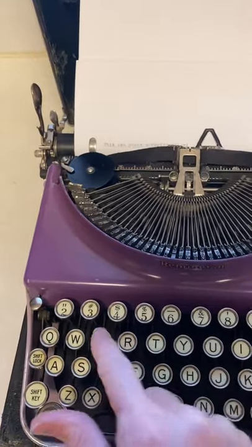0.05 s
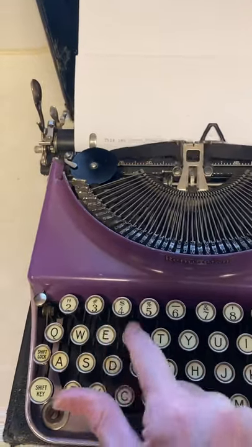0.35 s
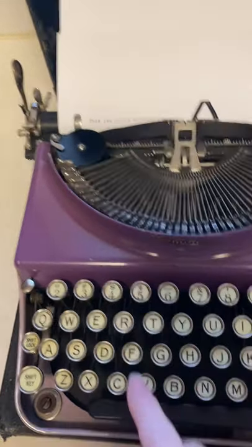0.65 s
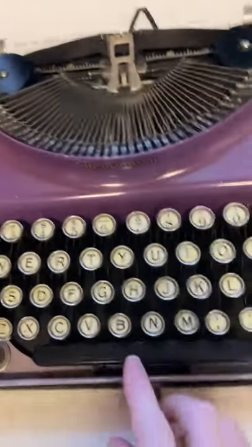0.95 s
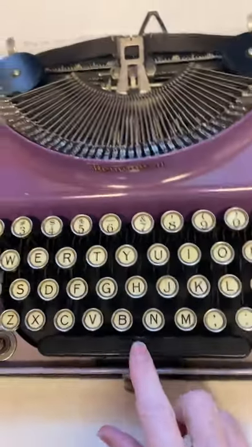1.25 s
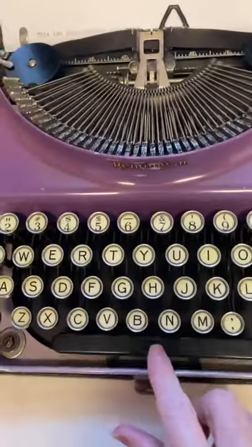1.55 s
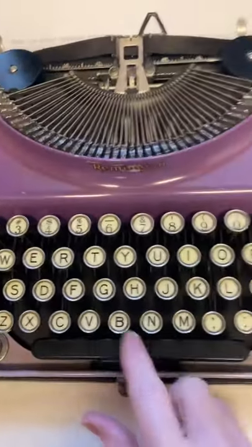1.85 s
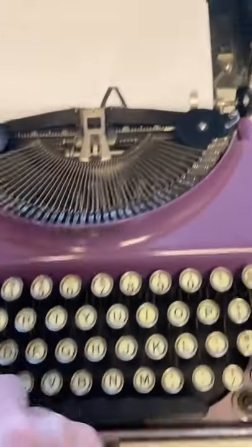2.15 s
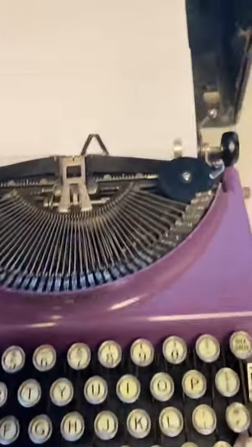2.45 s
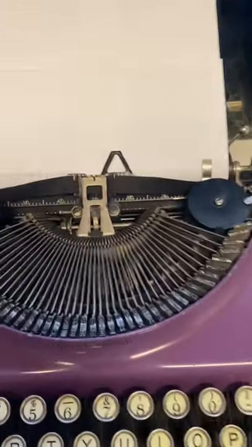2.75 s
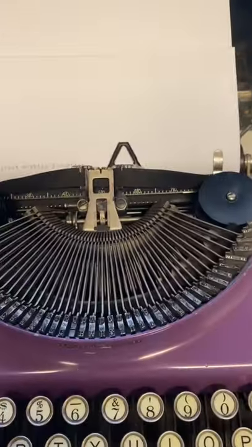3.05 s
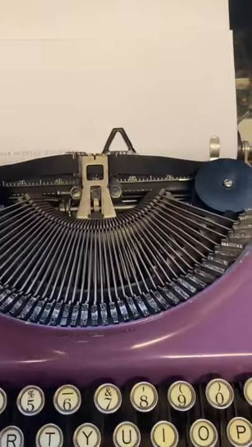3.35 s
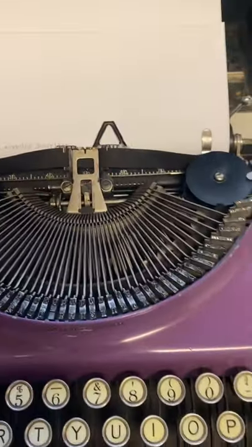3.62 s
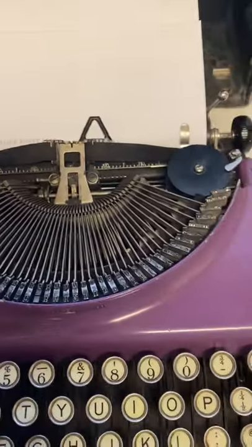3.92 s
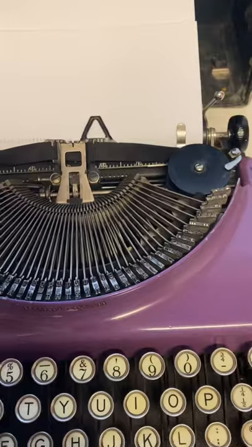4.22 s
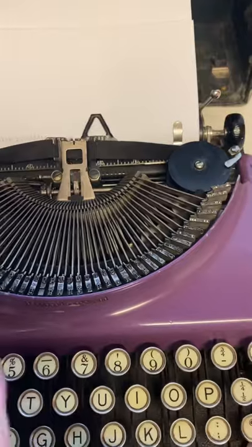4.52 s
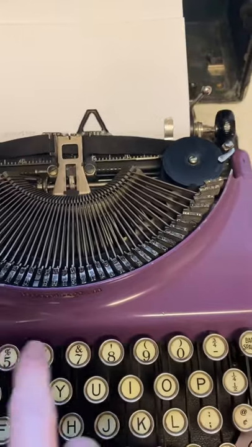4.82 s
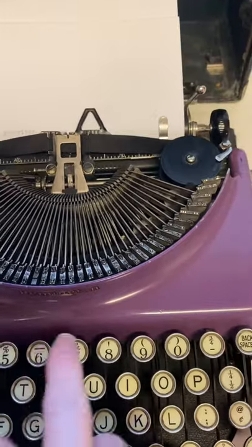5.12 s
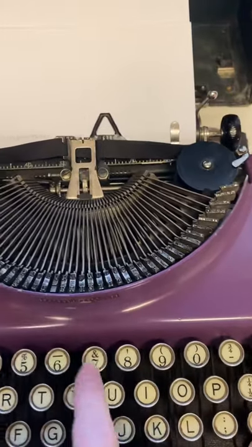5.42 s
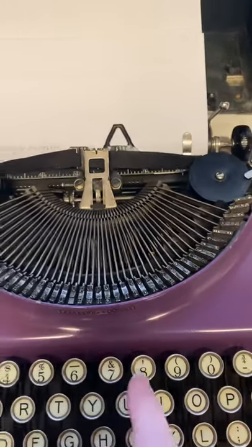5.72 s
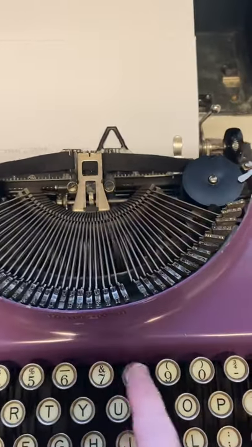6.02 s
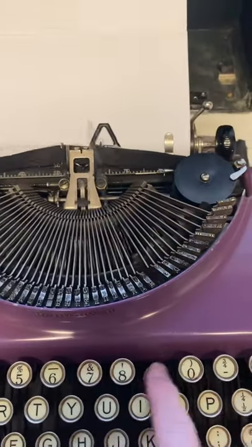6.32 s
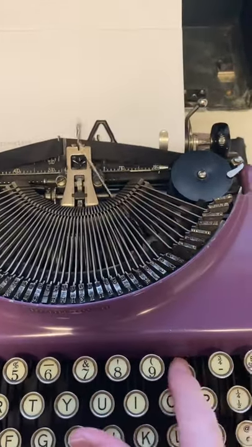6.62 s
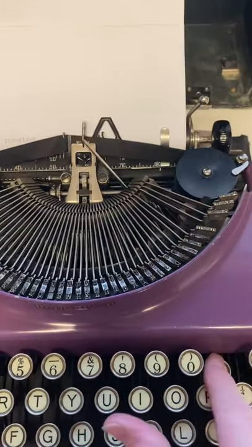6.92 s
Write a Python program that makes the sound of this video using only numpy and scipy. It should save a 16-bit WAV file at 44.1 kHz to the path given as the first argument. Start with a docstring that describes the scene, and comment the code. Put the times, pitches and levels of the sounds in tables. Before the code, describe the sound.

Close, one-finger typing on a manual typewriter, with sharp clacks and rattling knocks, a few lighter space bar taps and a short pause.

```python
"""A small room, a desk, and a portable manual typewriter typed with one finger near a two-port microphone.
Each letter is a key tick, the typebar's rattling swing, its smack on the platen, then knocks as the bar
drops back and the carriage steps. Each bar adds its own note, case and desk boom, and a faint, very high
shimmer lingers. After the first two letters come four taps of the space bar and a pause with one faint
bump, then ten more letters. Low handling rumble from the hand-held microphone lies under it all."""
import sys
import numpy as np
from scipy import signal
from scipy.fft import rfft, irfft
from scipy.io import wavfile
from scipy.ndimage import uniform_filter1d

SR = 44100
rng = np.random.default_rng(int(sys.argv[2]) if len(sys.argv) > 2 else 0)


def store_wav(level_fs):
    """Save 16-bit WAV to argv[1]."""
    pcm = np.round(np.clip(np.atleast_2d(level_fs), -1, 1) * 32767)
    wavfile.write(sys.argv[1], SR, pcm.T.astype(np.int16))


N = 311787

# EQ curves. Each row: frequency in Hz, relative level in dB.
BED_EQ = [(20, -18), (45, -10), (80, -1), (150, -7), (250, -9), (350, -7), (480, -19.5), (1100, -22.5),
          (1900, -25), (3200, -31), (5000, -36), (9000, -48), (15000, -52)]
REVERB_EQ = [(60, -3.5), (300, -10.5), (600, 6), (1800, -0.5), (3200, 1), (4500, 0.5), (8000, -2.5),
             (14000, -4.5)]
SCUFF_EQ = [(400, -6), (1000, -2), (1800, 3), (3300, 0), (4200, -4), (6800, -4), (9000, -8), (15000, -20)]
CLICK_EQ = [(60, -4.5), (350, 6.5), (700, -0.5), (1550, 1), (3000, 1), (4500, -0.5), (6800, 1),
            (8200, -6.5), (10000, -7), (12500, -2.5), (14200, 0.5), (16000, -7)]  # levers and pawls
CLATTER_EQ = [(60, -8.5), (350, 10), (600, -1), (1000, 0), (1550, 2), (2100, 0.5), (3000, 0), (4500, 0),
              (6500, 1.5), (7700, -2), (10000, -17), (14000, 3), (16000, -9)]  # loose parts swinging, sliding and landing
RATTLE_EQ = [(60, -12), (350, 5), (800, -4), (1300, -0.5), (1900, 0.5), (2700, 4.5), (3500, 0.5),
             (4600, -3), (7000, -7.5), (10000, -19), (15000, -21.5)]  # the shake just after a strike
SMACK_EQ = [(40, -23), (200, -12), (480, -1.5), (650, -8), (850, -15), (1150, -5), (1450, -4.5), (1850, 1),
            (2550, -3.5), (3500, -5), (4400, -2.5), (6700, -4), (9000, -16), (15000, -15.5)]  # type hitting the platen
# The low handling rumble, which sinks during the pause. Each row: time in seconds, relative level in dB.
HANDLING_LEVEL = [(2.0, -0.5), (2.8, -2), (3.1, -7.5), (3.5, -7.5), (5.6, -0.5)]
# Reverb length. Each row: frequency in Hz, seconds to die by 60 dB.
REVERB_T60 = [(80, 0.96), (300, 0.35), (1000, 0.4), (2500, 0.4), (5000, 0.41), (8000, 0.21), (15000, 0.056)]
# How alike the two ports hear the direct sound and the room. Each row: frequency in Hz, likeness 0 to 1.
DIRECT_LIKENESS = [(100, .98), (400, .98), (600, .76), (1100, .92), (1800, .96), (2700, .7), (4000, .62),
                   (5200, .6), (7000, .86), (8500, .98), (11000, .98), (13000, .66)]
ROOM_LIKENESS = [(100, .97), (350, .96), (650, .58), (1200, .7), (1800, .8), (2700, .3), (3800, .22),
                 (5200, .5), (7000, .72), (8500, .98), (11000, .98), (13000, .55)]
# Phase between the ports. Each row: frequency in Hz, lead of the left in radians.
LEFT_LEAD = [(60, 0), (400, -.25), (1100, 0), (1800, .15), (2700, .42), (3800, .65), (5200, 1.55),
             (7000, 2.3), (8500, 3), (11000, 3.25), (12500, 3.9), (15000, 4.2)]
# Pan of fully alike sound. Each row: frequency in Hz, left minus right in dB.
PORT_BALANCE = [(300, 0), (650, -2), (1100, -2), (1800, 0), (2700, -2), (5000, -1), (7000, 0)]

# Ringing tones. Each row: pitch in Hz, relative level in dB, seconds to die by 60 dB.
BUMP_MODES = [(1066, -3, .12), (1680, -4, .06), (1787, 0, .12), (2261, -6, .08), (2430, -5, .05),
              (3198, -1, .07), (5044, -11, .08), (6665, -6, .08), (8200, -4, .08)]  # a small hard object further off
SHIMMER_MODES = [(12500, -8, .2), (12950, -5, .3), (13190, -5, .39), (13370, -3.5, .35), (13570, -3.5, .3),
                 (13910, -1.5, .17), (14040, -1, .3), (14400, -2.5, .26), (14660, -1, .24),
                 (15170, 1.5, .12)]
LINKAGE_MODES = [(1520, 0, .05), (3200, -1, .05), (4050, -2, .07), (6750, -4, .04)]
DESK_MODES = [(64, -5, 0.22), (74.5, -2, 0.33), (97, -3, 0.24), (112, -5, .2), (127, -4.5, 0.22),
              (138, -6, 0.19), (157.6, -2.5, 0.2), (169, 1, 0.15)]
CASE_MODES = [(231, -9, 0.3), (293.9, 0.5, 0.19), (314.8, -0.5, .14), (361.7, -1.5, 0.16),
              (447.3, -4.5, 0.095), (511, -9.5, 0.13), (696, -12, 0.06), (765.3, -11, 0.06),
              (1006.5, -12, 0.045), (1407, -10, 0.03), (1555, -8, 0.03)]
STEEL_MODES = [(377, 1.5, 0.33), (499, 1, .35), (702, -0.5, 0.22), (1138, -4.5, .3), (1280, -6.5, 0.23),
               (1640, -3, 0.2), (1850, 1, .24), (1940, -4.5, 0.18), (2290, -4, 0.22), (2680, -4.5, 0.16),
               (2915, -6.5, 0.16), (3910, -9, 0.2), (4620, -8, .22), (5349, -9.5, 0.25), (1842, -8, .9),
               (2428, -11, .9), (3500, -13, .8), (4225, -12, .8)]
PLATEN_MODES = [(516, -9, 0.01), (692.3, -9, 0.042), (1139.6, -6, 0.03), (1240, -9, 0.016),
                (1656, -4, 0.024), (1861, 1.5, 0.026), (1950, -5, .018), (2234, -2.5, .018)]
TYPE_GUIDE_MODES = [(2500, 1, 0.024), (2610, -2, .024)]
# A typebar's ring. Each row: multiple of its pitch, relative level in dB, seconds to die by 60 dB.
TYPEBAR_PARTIALS = [(1, -3, .028), (1.035, -9, .03), (1.58, -11, .025), (1, -24, .2)]

# A finger settles on the space bar; linkage, escapement and pawl click as the bar goes down and up.
# Each row: start in seconds, relative level in dB, relative treble in dB.
SPACE_TOUCHES = [(0.852, -48, 1.5), (0.909, -49, -35), (0.95, -59.5, -42)]
SPACE_BAR_CLICKS = [(1.004, -39.5, 5.5), (1.0251, -35, 3), (1.043, -39.5, -15), (1.109, -41, -1),
                    (1.124, -37, -9), (1.137, -32.5, 3), (1.148, -45, -5), (1.2128, -42.5, 16),
                    (1.2395, -34, 13), (1.32, -50, 1), (1.3371, -42, 1), (1.4169, -40.5, 7),
                    (1.44, -34.5, 8.5), (1.46, -45, -23), (1.511, -41.5, -10), (1.521, -48.5, 2),
                    (1.5329, -35.5, -6), (1.6326, -42, 6), (1.6524, -34, 11), (1.671, -41.5, -17),
                    (1.7472, -40, -5.5), (1.759, -44, -4), (1.769, -36.5, 2.5), (1.78, -39.5, 6)]
# The space bar comes back up. Each row: arrival in seconds, force in dB.
SPACE_RETURNS = [(1.163, 2), (1.355, -.5), (1.556, -1), (1.791, -1)]
# After a letter. Each row: bar's fall in seconds, its weight in dB, carriage's stop in seconds,
# its force in dB.
LETTER_RETURNS = [(0.163, -4, 0.191, -2.5), (0.484, -3, 0.5, -3), (3.709, 6, 3.727, 0.5),
                  (4.059, -7, 4.0715, 4), (4.362, 6, 4.392, 0), (4.682, -1.5, 4.702, -1),
                  (4.985, -1, 5.006, -1.5), (5.334, 0.5, 5.361, 2), (6.006, -16, 6.022, 6.5),
                  (6.327, 2, 6.349, 0.5), (6.663, 3, 6.688, 0), (6.999, 2, 7.025, 1.5)]
# The letters. Each row: strike time in seconds, force in dB, rattle trim in dB, finger's head start in
# seconds, swing length in seconds, trims in dB for finger tap, swing, platen note and type guide note,
# bar's pitch in Hz, trims in dB for the bar's ring and the shimmer.
KEYSTROKES = [(0.0806, -1, -10.5, 0.051, 0.0275, 4, -3, -7, -10, 4230, 4, -4.5),
              (0.357, -1, -7, 0.046, 0.025, 0.5, 0, 2, -5, 4260, -1, -5),
              (3.633, 0, 6, 0.055, 0.032, 8, 0, -1, -2, 4350, 1, -3),
              (3.959, -0.5, 4, 0.048, 0.024, 7, 2, -1, -6, 4270, -1, -2.5),
              (4.2783, -1.5, 3, 0.066, .035, 7, -2, 0, -2, 4170, 3, -3.5),
              (4.5715, 0, 3, 0.047, 0.024, 7, 3, 0, -10, 4400, -3, -2),
              (4.8759, -2, 0, 0.049, 0.024, 6.5, -2, -1, -6, 4250, -5, -7),
              (5.1928, -1, 4.5, .053, 0.027, 6.5, 1, -1, 0, 4700, -2, -5),
              (5.8678, -1, 4, .054, 0.026, 3, 0, -1, 2, 5380, -3, -3.5),
              (6.2059, -0.5, 2.5, 0.056, 0.029, 0.5, 1, 2, 3, 4220, -2, -4),
              (6.5341, -2, 1.5, 0.065, 0.029, 3.5, 1, -2, 0, 5900, -6, -2.5),
              (6.8582, -2, 2, 0.052, 0.025, 12, 0, -1, -1, 4250, -1, -3.5)]

# An average knock. Each lists clatter, treble, case and desk, all in relative dB.
BAR_FALL = (-32.5, -1.5, -32.5, -38)
CARRIAGE_STOP = (-33.5, -1, -37, -37.5)
SPACE_STOP = (-32.5, 3, -29, -36.5)
# What those four gain in dB for each dB of force.
PADDED_REST = (.11, 0, .92, .5)  # passes the force to the case
METAL_STOP = (1.3, .53, .76, .024)  # gets brighter

FALL_DECAY_S, STOP_DECAY_S, SPACE_DECAY_S = .011, .006, .008  # clatter envelopes
CRACK_DB, NOTE_DB, SHOVE_DB, RATTLE_DB, SWING_DB = -16.5, -16, -21, -24, -31  # layers before trims
SHIMMER_STRIKE_DB, SHIMMER_STOP_DB, SHIMMER_SPACE_DB = -41.5, -48.5, -51  # before trims
DRIFT_S, LOWPASS_HZ = .4, 16100  # crossfade between reverbs; top of the band


def amp(db):
    """Decibels to gain."""
    return 10 ** (np.asarray(db) / 20)


def curve(points, hz):
    """Reads rows of frequency and value along a log-frequency axis."""
    freqs, values = np.transpose(points)
    return np.interp(np.log(hz + 1), np.log(freqs), values)


def clock(seconds):
    """Time axis of a short sound."""
    return np.arange(int(seconds * SR)) / SR


def add(mix, start, sound):
    """Lays a mid/side sound into the mix at `start` seconds."""
    part = mix[:, max(round(start * SR), 0):][:, :sound.shape[1]]
    part += sound[:, :part.shape[1]]


def equalise(x, eq, treble_db=0, size=2048):
    """Minimum-phase EQ with a treble shelf, levelled by its power in the midrange."""
    hz = abs(np.fft.fftfreq(size, 1 / SR))
    gain = amp(curve(eq, hz) + treble_db * curve([(1500, 0), (9000, 1)], hz))
    midrange = (hz > 700) & (hz < 7000)
    gain /= np.sqrt(np.mean(gain ** 2 * midrange))
    taps = np.fft.ifft(np.exp(np.conj(signal.hilbert(np.log(gain))))).real
    return signal.fftconvolve(x, taps[None], axes=1)


def wobble(shape, hz):
    """Smooth random modulation of unit spread, rolling off above `hz`."""
    rolloff = np.exp(-(np.fft.rfftfreq(N, 1 / SR) / hz) ** 2)
    drift = irfft(rfft(rng.standard_normal(shape)) * rolloff, N)
    return drift / drift.std()


def chatter(t, clump_db, size=40):
    """Loose parts touching: noise in clumps about a millisecond long."""
    grain = uniform_filter1d(rng.standard_normal(len(t)), size) * np.sqrt(size)
    clumps = amp(clump_db * np.clip(grain, -2, 2))
    return rng.standard_normal((2, len(t))) * clumps / np.sqrt(np.mean(clumps ** 2))


def mid_side(waves, side_phase):
    """Sums partials twice: as they are for the mid, phase-shifted for the side."""
    return np.array([waves.sum(0), (waves * np.exp(2j * np.pi * side_phase)).sum(0)]).imag


def ring(modes, build, vary_db, detune):
    """Modes rung by one blow; each swells over `build` cycles, so the lowest bloom last."""
    t = clock(.6)
    hz, db, t60 = np.transpose(modes)[:, :, None]
    level, pitch, phase, side_phase = rng.standard_normal((4, len(modes), 1))
    cycles = hz * (1 + detune * pitch) * t
    envelope = amp(db + vary_db * level - 60 * t / t60) * (1 - np.exp(-(cycles / build) ** 2))
    waves = envelope * np.exp(2j * np.pi * (cycles + phase))
    return mid_side(waves, side_phase) / np.sqrt(np.sum(amp(db) ** 2) / 2)


def ports(x, likeness):
    """Mid and side become the microphone's left and right, with width, phase and pan set by frequency."""
    hz = np.fft.rfftfreq(2 * N, 1 / SR)
    alike = np.clip(curve(likeness, hz), 0, 1)
    mid, side = rfft(x, 2 * N) * np.sqrt([(1 + alike) / 2, (1 - alike) / 2])
    pan = amp(alike * curve(PORT_BALANCE, hz) / 2)  # diffuse sound favours neither port
    tilt = pan * np.exp(.5j * curve(LEFT_LEAD, hz))
    return irfft(np.array([(mid + side) * tilt, (mid - side) / tilt]))[:, :N]


def noise_bed():
    """Faint steady room tone over a low handling rumble that swells and sinks."""
    hz = np.fft.rfftfreq(N, 1 / SR)
    spectrum = rfft(rng.standard_normal((2, N))) * amp(curve(BED_EQ, hz))
    lows = 1 / (1 + (hz / 450) ** 4)
    rumble_db = 2.2 * wobble(N, hz=6) + np.interp(np.arange(N) / SR, *np.transpose(HANDLING_LEVEL))
    bed = irfft(spectrum * lows, N) * amp(rumble_db) + irfft(spectrum * (1 - lows), N)
    return amp(-66) * bed / bed.std()


def reverb(x):
    """The room's diffuse tail, each band dying at its own speed."""
    hz, t, bands = signal.stft(rng.standard_normal((2, SR)), SR, nperseg=256)
    t60 = curve(REVERB_T60, hz)[:, None]
    bands *= amp(curve(REVERB_EQ, hz)[:, None] - 60 * t / t60)
    bands /= np.sqrt(t60 * SR / np.log(1e6))  # a longer decay adds no energy
    fade_in = 1 - np.exp(-(clock(1) / .0054) ** 2)
    tail = signal.istft(bands, SR, nperseg=256)[1][:, :SR] * fade_in
    return signal.fftconvolve(x, tail, axes=1)[:, :N]


def drifting_reverb(x, count=3):
    """The hand-held microphone drifts: the send circles through reverbs, so the reflections change."""
    position = np.arange(N) / SR / DRIFT_S
    sends = [np.maximum(1 - abs((position - k + 1) % count - 1), 0) for k in range(count)]
    return sum(reverb(x * np.sqrt(send)) for send in sends)


def far_bump(start=2.934, length_s=.09):
    """Something small and hard is bumped further off: a scuff and a short ring, mostly reverb."""
    out, t = np.zeros((2, N)), clock(length_s)
    scuff = chatter(t, clump_db=2) * (1 - np.exp(-t / .005)) * (1 - t / length_s)
    add(out, start, amp(-66) * equalise(scuff, SCUFF_EQ))
    add(out, start + .008, amp(-60) * ring(BUMP_MODES, build=3, vary_db=1, detune=.002))
    return amp(-6) * out + reverb(out)


def high_shimmer():
    """A faint, very high, uneven shimmer after each strike and return."""
    out = np.zeros((2, N))
    onsets = [(up, SHIMMER_SPACE_DB + force_db) for up, force_db in SPACE_RETURNS]
    for (strike, *_, trim_db), (_, _, stop, _) in zip(KEYSTROKES, LETTER_RETURNS):
        onsets += [(strike, SHIMMER_STRIKE_DB + trim_db), (stop, SHIMMER_STOP_DB + trim_db)]
    for start, db in onsets:
        add(out, start, amp(db - 2) * ring(SHIMMER_MODES, build=30, vary_db=5, detune=.012))
    return out * (1 + wobble((2, N), hz=60)) / np.sqrt(2)


def carriage_rattle():
    """The carriage rattles along one step as the space bar rises or a typebar drops."""
    out = np.zeros((2, N))
    steps = [(up, .08, force_db - 41) for up, force_db in SPACE_RETURNS]
    steps += [((fall + stop) / 2, .05, -39) for fall, _, stop, _ in LETTER_RETURNS]
    for middle, length_s, db in steps:
        t = clock(length_s)
        slide = chatter(t, clump_db=3.5) * np.sin(np.pi * t / length_s)
        add(out, middle - length_s / 2, amp(db) * equalise(slide, CLATTER_EQ, treble_db=-2))
    return out


def lever_ticks():
    """Levers and pawls tick and ring brightly; the finger's push reaches case and desk a moment later."""
    out, t = np.zeros((2, N)), clock(.05)
    keys, lifts, trips = [], [], []
    for strike, _, _, lead_s, swing_s, tap_db, *_ in KEYSTROKES:
        keys.append((strike - lead_s, tap_db - 46.5, -1.5))  # finger lands on the key
        lifts.append((strike - swing_s, -34, 2))  # linkage snaps taut as the bar leaves its rest
        trips.append((strike - .0064, -35, -1.5))  # the swinging bar trips the escapement
    for start, db, treble_db in keys + lifts + trips + SPACE_BAR_CLICKS + SPACE_TOUCHES:
        tick = chatter(t, clump_db=3.5) * np.exp(-t / .005) * (1 - np.exp(-t / .002))
        add(out, start, amp(db + 5.5) * equalise(tick, CLICK_EQ, treble_db + 1.5))
        add(out, start, amp(db - 2) * ring(LINKAGE_MODES, build=6, vary_db=3, detune=.04))
        add(out, start + .006, amp(db - 4) * ring(CASE_MODES, build=1, vary_db=-1.5, detune=.073))
        add(out, start + .005, amp(db - 5.5) * ring(DESK_MODES, build=.7, vary_db=3.5, detune=.023))
    return out


def return_knocks():
    """Typebar, carriage and space bar hit their stops: clatter, a hollow case note, a slower desk boom."""
    out, t = np.zeros((2, N)), clock(.12)
    hits = []
    for fall, fall_db, stop, stop_db in LETTER_RETURNS:
        hits.append((fall, FALL_DECAY_S, BAR_FALL, PADDED_REST, fall_db))
        hits.append((stop, STOP_DECAY_S, CARRIAGE_STOP, METAL_STOP, stop_db))
    hits += [(up, SPACE_DECAY_S, SPACE_STOP, METAL_STOP, force_db) for up, force_db in SPACE_RETURNS]
    for start, decay_s, average, response, force_db in hits:
        clatter_db, treble_db, case_db, desk_db = np.add(average, np.multiply(response, force_db))
        clatter = chatter(t, clump_db=4.5) * np.exp(-t / decay_s) * (1 - np.exp(-t / .0015))
        add(out, start, amp(clatter_db + 5) * equalise(clatter, CLATTER_EQ, treble_db - 3.5))
        add(out, start + .003, amp(case_db + 4) * ring(CASE_MODES, build=1.1, vary_db=.5, detune=.02))
        add(out, start, amp(desk_db + 8) * ring(DESK_MODES, build=1, vary_db=.5, detune=.071))
    return out


def strike_note(platen_db, guide_db, bar_hz, bar_db):
    """Platen, type guide and bar answer a strike with a short ping, blended differently for each letter."""
    t = clock(.2)
    modes = np.vstack([np.add(PLATEN_MODES, (0, platen_db, 0)),
                       np.add(TYPE_GUIDE_MODES, (0, guide_db, 0)),
                       np.multiply(TYPEBAR_PARTIALS, (bar_hz, 1, 1)) + (0, bar_db, 0)])
    hz, db, t60 = modes.T[:, :, None]
    level, pitch, side_phase = rng.standard_normal((3, len(modes), 1))
    envelope = amp(db + 1.5 * level - 60 * t / t60) * (1 - np.exp(-t / .00022))
    waves = envelope * np.exp(2j * np.pi * hz * (1 + .01 * pitch) * t)
    return mid_side(waves, side_phase)


def typebar_strikes(tone_db=0):
    """The bar rattles up, smacks the platen, shoves the carriage and sets steel, case and desk ringing."""
    out, t = np.zeros((2, N)), clock(.08)
    push = (t / .002) ** 2 * np.exp(2 - 2 * t / .0019)
    shove = push * np.sin(2 * np.pi * 355 * t) * [[1], [0]]  # a low punch, in the mid only
    for strike, force_db, rattle_db, _, swing_s, _, swing_db, *note, _ in KEYSTROKES:
        swing_t = clock(swing_s)
        swing = chatter(swing_t, clump_db=4) * (1 - np.exp(-swing_t / .009))
        add(out, strike - swing_s, amp(SWING_DB + swing_db) * equalise(swing, CLATTER_EQ))
        crack = chatter(t, clump_db=.5) * np.exp(-t / .006) * (1 - np.exp(-t / .00048))
        add(out, strike - .0003, amp(CRACK_DB + force_db + 8) * equalise(crack, SMACK_EQ))
        add(out, strike, amp(NOTE_DB + force_db + tone_db + 2.5) * strike_note(*note))
        add(out, strike + .0016, amp(SHOVE_DB + force_db + 10.5) * shove)
        rattle = chatter(t, clump_db=.5) * np.exp(-t / .013) * (1 - np.exp(-t / .0018))
        add(out, strike + .004, amp(RATTLE_DB + rattle_db) * equalise(rattle, RATTLE_EQ))
        steel = amp(tone_db - 41) * ring(STEEL_MODES, build=2, vary_db=2, detune=.008)
        case = amp(SHOVE_DB - 15.5) * ring(CASE_MODES, build=.85, vary_db=1.5, detune=.055)
        desk = amp(SHOVE_DB - 12) * ring(DESK_MODES, build=.72, vary_db=2.5, detune=.03)
        add(out, strike, amp(force_db) * (steel + case + desk))
    return out


def scene():
    """The machine close up, with the room spread wider around it."""
    strikes, ticks = typebar_strikes(), lever_ticks()
    details = return_knocks() + carriage_rattle() + high_shimmer()
    wet = drifting_reverb(details + amp(-1) * ticks + amp(-6) * strikes)
    sideways = typebar_strikes(tone_db=-9)  # sideways, a strike throws more clatter than note
    wet += drifting_reverb(amp(-1.5) * sideways)
    ambience = amp(-8) * wet + far_bump() + noise_bed()
    return ports(strikes + ticks + details, DIRECT_LIKENESS) + ports(ambience, ROOM_LIKENESS)


def record(dry):
    """A soft clip rounds the loudest peaks, then a steep low-pass trims the very top."""
    rounded = dry / (1 + (dry / .95) ** 6) ** (1 / 6)
    lowpass = signal.firwin(511, LOWPASS_HZ, window=("kaiser", 9), fs=SR)
    return signal.oaconvolve(rounded, lowpass[None], "same")


dry = scene()
out = record(dry)
store_wav(out)
```